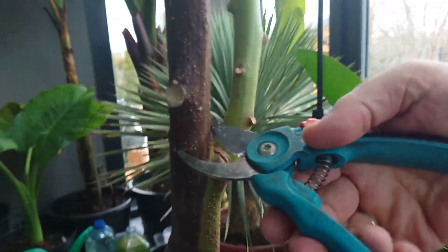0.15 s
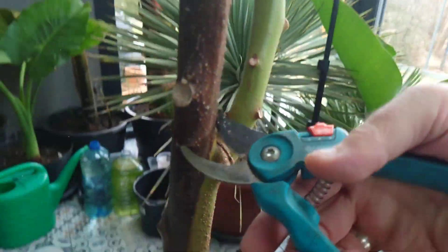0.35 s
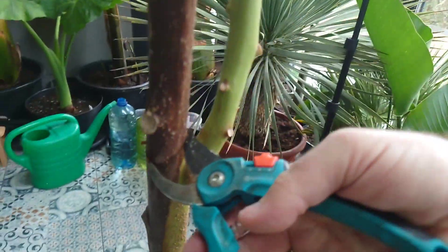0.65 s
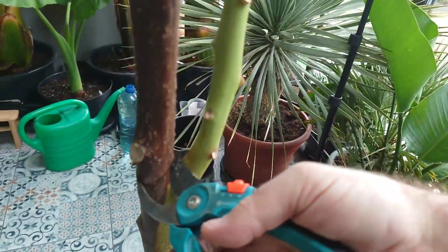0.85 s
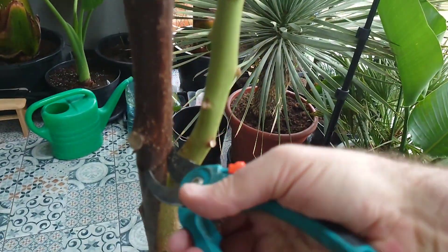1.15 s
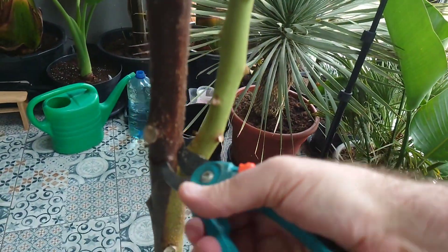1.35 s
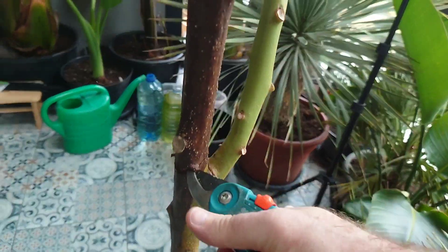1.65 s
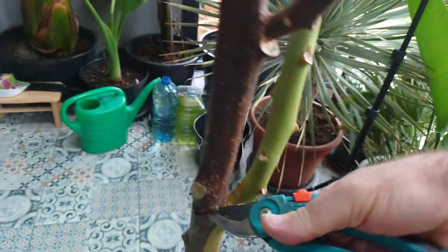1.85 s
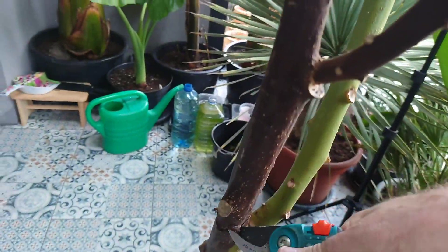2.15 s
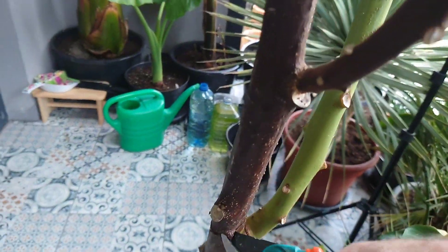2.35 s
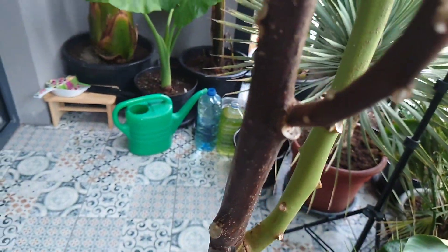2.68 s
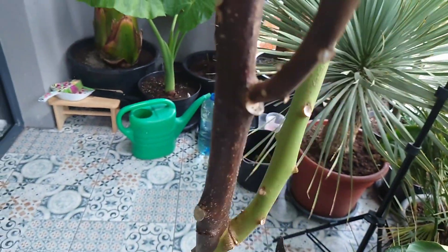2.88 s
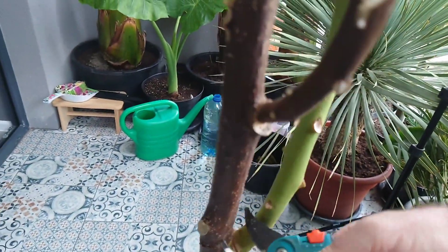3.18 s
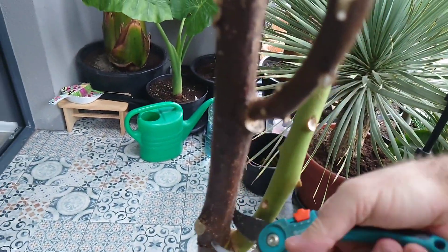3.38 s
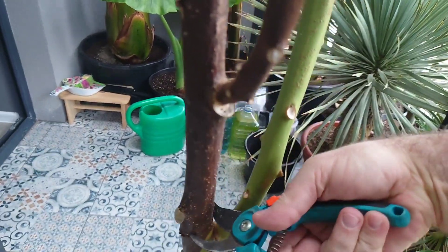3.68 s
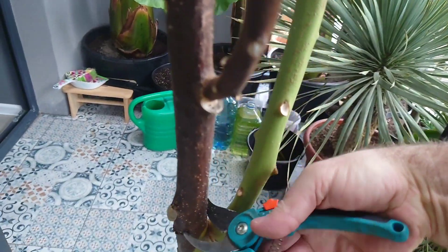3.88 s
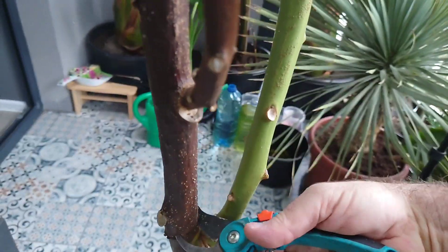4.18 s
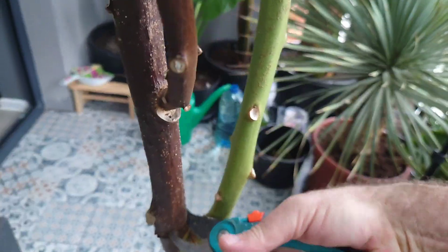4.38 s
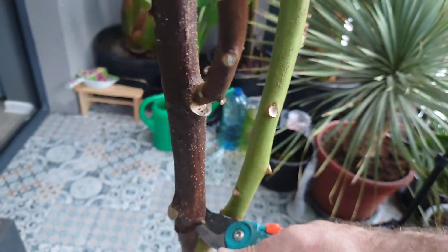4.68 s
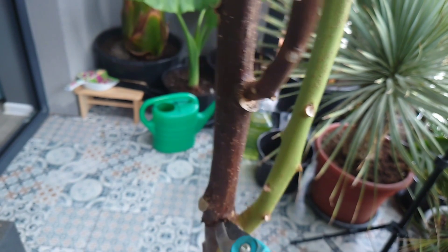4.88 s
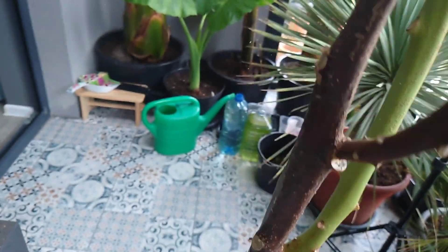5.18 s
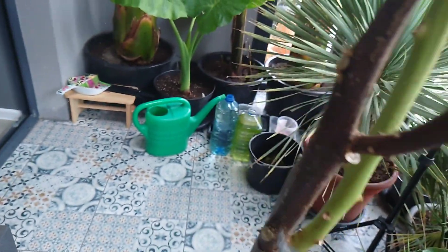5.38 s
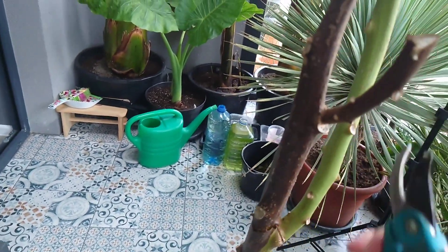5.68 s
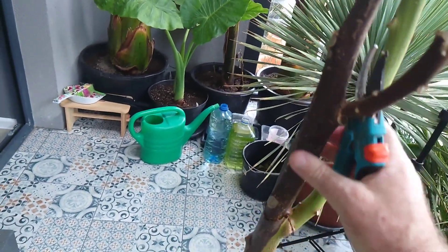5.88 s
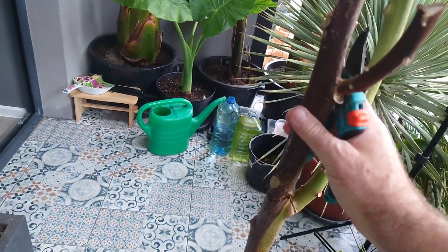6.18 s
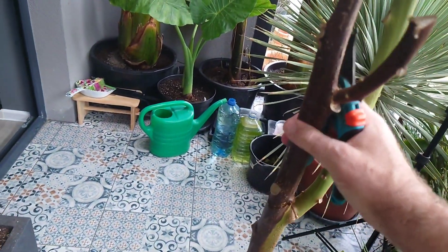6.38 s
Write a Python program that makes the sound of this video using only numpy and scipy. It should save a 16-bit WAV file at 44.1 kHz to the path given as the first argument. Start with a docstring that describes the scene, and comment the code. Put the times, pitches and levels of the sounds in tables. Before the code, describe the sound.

A hand works pruning shears on a hollow plant stem. Cloth swishes and dull clicks lead to a bright snapping cut, followed by scattered cracks, faint creaks and a thin zip of fabric. After a cluster of ticks comes another sharp clack, then rustling, fumbling and a knock. The sound is close and slightly right of centre, with short diffuse reflections from a small hard-floored room.

```python
"""In a small tiled conservatory, secateurs cut twice through a hollow plant stem, heard close up.
Each cut is a short crunch of breaking fibres, then a clack of the handles and a ringing spring of decaying noise.
Cracks and ticks between the cuts are noise bursts, each with one resonance; rubs, creaks and thin zips join them.
A sleeve swishes in three bands of grainy noise, over low rumble, soft air and a diffuse room.
Two microphone ports, each with its own response, colour everything differently."""
import sys
import numpy as np
from scipy import signal
from scipy.fft import rfft, irfft, next_fast_len
from scipy.io import wavfile

SR = 44100
rng = np.random.default_rng(int(sys.argv[2]) if len(sys.argv) > 2 else 0)


def store_wav(level_fs):
    """Save 16-bit WAV to argv[1]."""
    pcm = np.round(np.clip(np.atleast_2d(level_fs), -1, 1) * 32767)
    wavfile.write(sys.argv[1], SR, pcm.T.astype(np.int16))


N = 288674
TIME = np.arange(N) / SR
PADDED = next_fast_len(N, True)  # samples in a whole-length spectrum
BIN_HZ = np.fft.rfftfreq(PADDED, 1 / SR)


def gain_of(db):
    """Decibels to amplitude."""
    return 10 ** (np.asarray(db) / 20)


def evened(x):
    """Scaled to rms 1."""
    return x / np.sqrt(np.mean(x ** 2) + 1e-20)


def read(points, hz):
    """A curve joined by straight lines on a log-frequency axis."""
    f, value = np.transpose(points)
    return np.interp(np.log(hz + 1), np.log(f + 1), value)


def add(mix, s, sound):
    """Mixes a sound in at time s, in seconds."""
    part = mix[max(round(s * SR), 0):][:len(sound)]
    part += sound[:len(part)]


def colour(x, points, size=2048):
    """Causal minimum-phase filter with the given spectrum: nothing sounds before the attack."""
    log_gain = np.log(gain_of(read(points, abs(np.fft.fftfreq(size, 1 / SR)))))
    taps = np.fft.ifft(np.exp(np.conj(signal.hilbert(log_gain)))).real
    return signal.oaconvolve(x, taps[:size // 2])


def noise(points):
    """Steady noise with the given spectrum."""
    white = rfft(rng.standard_normal(PADDED))
    return irfft(white * gain_of(read(points, BIN_HZ)), PADDED)[:N]


def waver(rate_hz):
    """Random drift of rms 1; its spectrum falls by a factor e for every rate_hz."""
    white = rfft(rng.standard_normal(PADDED))
    return evened(irfft(white * np.exp(-BIN_HZ / rate_hz), PADDED)[:N])


def fracture(length, spread_db):
    """A run of tiny breaks of uneven size, with an even spectrum and rms 1."""
    count = max(int(length * SR), 8)
    push, size = rng.standard_normal((2, 4096))[:, :count]
    spectrum = rfft(push * gain_of(spread_db * size))
    flat = spectrum / (abs(spectrum) + 1e-9)
    return evened(irfft(flat, count))


def peak(hz, centre_hz, width_hz):
    """Gain of a single resonance, 1 at its centre."""
    return 1 / np.sqrt(1 + ((hz - centre_hz ** 2 / hz) / width_hz) ** 2)


def ringing(points, centre_hz, db, width_hz, size=160):
    """A spectrum with one resonance standing on it."""
    hz = np.geomspace(20, SR / 2, size)
    gain = np.hypot(gain_of(read(points, hz)), gain_of(db) * peak(hz, centre_hz, width_hz))
    return np.transpose([hz, 20 * np.log10(gain)])


def at_ports(x):
    """The hand works a little to the right, so its sound reaches the left port later."""
    # Lag of the left port behind the right. Each row: frequency in Hz, phase in radians.
    port_phase = [(50, 0), (1200, .25), (2100, -.8), (3100, -2.8), (3800, -5.2), (7300, -8.5), (8500, -14),
                  (16000, -23)]
    left = irfft(rfft(x, PADDED) * np.exp(1j * read(port_phase, BIN_HZ)), PADDED)[:N]
    return np.array([left, x])


def background(rumble_db=-50.5, air_db=-58, rumble_apart=0.49, air_apart=0.62):
    """Low rumble and the soft air of the room, mostly shared by both ports."""
    # Spectrum of the rumble. Each row: frequency in Hz, relative level in dB.
    rumble_shape = [(10, -5), (18, 3), (30, -9.5), (60, -14), (110, -26), (200, -33.5), (400, -59.5),
                    (1500, -74)]
    # Spectrum of the room air. Each row: frequency in Hz, relative level in dB.
    air_shape = [(100, -7), (260, -7), (380, 6), (500, -5), (700, -6.5), (1100, -11.5), (2000, -48),
                 (5000, -38), (15000, -22.5)]
    rumble_sides = np.array([noise(rumble_shape), noise(rumble_shape)])
    air_sides = np.array([noise(air_shape), noise(air_shape)])
    rumble = evened(noise(rumble_shape) + rumble_apart * rumble_sides)
    air = noise(air_shape) + air_apart * air_sides
    return gain_of(rumble_db) * rumble + gain_of(air_db) * air


def room(x, wet_db=-10, early_db=-11, early_decay=0.011):
    """Close leaves and tiles scatter the sound almost at once; the room follows with a diffuse tail."""
    # Reverberation time. Each row: frequency in Hz, time to fall by 60 dB in seconds.
    room_t60 = [(150, 0.62), (400, 0.34), (2000, 0.65), (6000, 0.33), (15000, 0.43)]
    # Tone of the tail. Each row: frequency in Hz, relative level in dB.
    room_colour = [(100, 15), (250, -12.5), (400, 11.5), (800, 2.5), (2000, -3.5), (6000, 5.5),
                   (15000, 1.5)]
    # about 4000 random reflections a second for each port
    taps = rng.choice([-1., 1.], (2, SR)) * (rng.random((2, SR)) < 4000 / SR)
    t = np.arange(SR) / SR
    hz, frame_s, z = signal.stft(taps * (t > .006), SR, nperseg=256)
    fall_db = 60 * frame_s / read(room_t60, hz)[:, None]
    z = z * gain_of(read(room_colour, hz)[:, None] - fall_db)
    tail = signal.istft(z, SR, nperseg=256)[1][:, :SR]
    early = taps[::-1] * np.exp(-t / early_decay) * (t > .001)
    echo = gain_of(wet_db) * evened(tail) + gain_of(early_db) * evened(early)
    return signal.fftconvolve(x[None], echo / np.sqrt(SR), axes=1)[:, :N]


def fidget():
    """Gain of the small movements of the arm and hand."""
    # Faint shifting of cloth and grip between strokes. Each row: time in seconds, level in dB.
    shifts = [(0, -59.5), (1.3, -58), (2, -55), (2.25, -60), (2.95, -57), (3.15, -66), (3.55, -63.5),
              (4.1, -64.5), (4.75, -62.5), (5.45, -57.5), (5.68, -63), (5.9, -56.5), (6.55, -60.5)]
    return gain_of(np.interp(TIME, *np.transpose(shifts)))


def strokes(size=32, rise_s=0.0092, fall_s=0.019, ease_share=0.1):
    """Levels of the body, hiss and fizz of the cloth: each stroke builds, holds with a swell and dies away."""
    # Strokes of the sleeve as the arm moves. Each row: start in seconds, length in seconds, level in dB,
    # swell over the stroke in dB, body in dB and fizz in dB against the hiss.
    swishes = [(0, 0.032, -45, -7, -10, 8), (0.617, 0.25, -48.5, -3, -1.5, -2), (0.84, 0.19, -40, 8, -4, 8),
               (1.204, 0.015, -55.5, 0, 12.5, 8), (1.691, 0.029, -37.5, 0, -2.5, -6),
               (1.773, 0.12, -40, 0.5, -2.5, 6), (2, 0.062, -62.5, -4, 12, -10),
               (2.395, 0.21, -49.5, 5.5, -1.5, -0.5), (2.729, 0.18, -49, -2.5, 3, 0),
               (3.246, 0.091, -56.5, -6, 3, -4), (3.342, 0.12, -53, -1.5, -14, -0.5),
               (3.636, 0.18, -47.5, 2, -18, 0), (4.175, 0.028, -49.5, -0.5, 3, 0),
               (4.476, 0.074, -55.5, 3.5, 10, 8), (4.622, .05, -56, -4, 2.5, 3),
               (4.937, 0.072, -45.5, -11.5, -1.5, -7), (5.066, 0.046, -44.5, 1.5, -1.5, -1),
               (5.213, 0.03, -47, -3, 0, 0), (5.322, 0.0072, -55, -7, 4, 10),
               (5.388, 0.037, -53.5, -3, 3.5, 9), (5.505, 0.073, -54.5, -6, -1, 4.5),
               (5.889, 0.13, -51.5, 8, 3, 4), (6.103, 0.18, -46.5, -6.5, 3, 0.5),
               (6.499, 0.023, -49.5, -1, 5.5, 2)]
    # the fizz needs speed: its steeper edges bring it in last and take it out first
    steepness = [[1], [1], [1.44]]
    t = TIME[::size]
    power = (fidget()[::size] * gain_of([[6], [0], [1.5]])) ** 2
    for s, length, db, swell_db, body_db, fizz_db in swishes:
        age, ease = t - s, ease_share * length
        rise = np.minimum(age, 0) / (rise_s + ease)
        fall = np.maximum(age - length, 0) / (fall_s + ease)
        hold = gain_of(db + swell_db * (np.clip(age / length, 0, 1) - .5))
        bands = gain_of([[body_db], [0], [fizz_db]])
        power += (hold * bands * np.exp((rise - fall) * steepness)) ** 2
    return [np.interp(TIME, t, level) for level in np.sqrt(power)]


def clothing(body, hiss, fizz, grain_db=2.5, grain_hz=170, body_db=-1, hiss_db=-1.5, fizz_trim_db=-1.0):
    """Threads catch and slip: a grainy swish whose three bands follow the stroke levels."""
    low = noise([(100, 2.5), (250, -7.0), (400, -3.0), (700, -3.5), (1000, -3.0),
                 (1600, -4.5), (2300, -6.5), (3200, -5.5), (6000, -33)])
    middle = noise([(500, -36), (1700, -11), (2700, -2.0), (7500, -2.0), (10000, -14.5), (13000, -27)])
    high = noise([(3000, -41.5), (7000, -8.5), (10000, -9), (15000, -5.5)])
    swish = gain_of(body_db) * body * low
    swish += gain_of(hiss_db) * hiss * middle
    swish += gain_of(fizz_trim_db) * fizz * high
    return swish * gain_of(grain_db * waver(grain_hz))


def zips(waver_hz=70):
    """Ribs of the weave run over each other and sing a thin, unsteady glide."""
    # The pitch falls as the arm slows. Each row: start in seconds, length in seconds,
    # first pitch in Hz, last pitch in Hz, level in dB.
    glides = [(2.516, 0.22, 10200, 9100, -61), (2.86, 0.18, 9100, 7600, -69), (4.3, .08, 7450, 7350, -69),
              (4.388, 0.057, 6600, 6000, -71)]
    out, unsteady = np.zeros(N), waver_hz * waver(400)
    for s, length, start_hz, end_hz, db in glides:
        hz = np.linspace(start_hz, end_hz, int(length * SR))
        turns = np.cumsum(hz + unsteady[:len(hz)]) / SR
        add(out, s, gain_of(db) * signal.windows.tukey(len(hz), .8) * np.sin(2 * np.pi * turns))
    return out


def rubs(stick_db=3, stick_hz=60):
    """Skin sticks and slips on bark and plastic with a dull rub."""
    # Slides of the hand. Each row: start in seconds, length in seconds, level in dB.
    slides = [(0.817, 0.11, -77), (2.465, 0.027, -58), (2.703, 0.15, -63.5), (5.87, 0.103, -62),
              (6.06, .27, -63.5), (6.486, .08, -60.5)]
    # Tone of the rub. Each row: frequency in Hz, relative level in dB.
    rub_colour = [(60, -10), (140, 4), (260, -9), (370, 4), (500, 2), (900, -19.5), (2500, -28)]
    pressure = np.zeros(N)
    for s, length, db in slides:
        add(pressure, s, gain_of(db) * signal.windows.tukey(int(length * SR), .5))
    return pressure * evened(noise(rub_colour)) * gain_of(stick_db * waver(stick_hz))


def creaks(per_second=16, over_fidget_db=16, spread_db=4, width_hz=260):
    """The gripped tool keeps giving tiny ticks as the hand shifts, each ringing one of its resonances."""
    out = np.zeros(N)
    for hz in (1130, 1400, 1890, 1990):
        size = gain_of(over_fidget_db + spread_db * np.minimum(rng.exponential(1, N), 2.5))
        pushes = size * (rng.random(N) < per_second / 4 / SR)  # the four resonances share the ticks
        shape = ringing([(100, -11), (3000, -16.0), (15000, -7)], hz, 7.9, width_hz)
        out += colour(pushes, shape)[:N]
    return out * fidget()


def clicks(rise_share=0.27, ring_q=4.24, ring_trim_db=-2, thud_under_ring_db=15):
    """Each click is a burst of breaks plus one ringing resonance; long scrapes start softly."""
    # Cracks of the stem, ticks and knocks of the tool. Each row: start in seconds, level in dB (rms of
    # the uncoloured burst over 10 ms), decay in seconds, ring in Hz, body in dB, fizz in dB.
    click_rows = [(0.252, -62.5, 0.0024, 1490, 22, -7), (0.548, -73, 0.00097, 1280, 31.5, -11),
                  (0.61, -49.5, 0.0032, 1325, 21, -6), (1.027, -35.5, 0.0052, 1990, 12.5, -2),
                  (1.2014, -46.5, 0.0034, 950, 16, -12), (1.304, -59, 0.00074, 332, 15, 23),
                  (1.318, -51.5, 0.0022, 1750, 16.5, 1), (1.519, -41.5, 0.0052, 670, 18.5, -9),
                  (2.103, -44, 0.015, 1090, -1, -0.5), (2.491, -54.5, 0.01, 390, 33.5, 2),
                  (2.721, -40.5, 0.013, 1700, 4, 2), (2.734, -46, 0.0076, 1500, 10, -6),
                  (2.748, -35, 0.0029, 1330, 13, -7), (2.803, -60, 0.0035, 800, 27, -8),
                  (3.619, -50, 0.0043, 1730, -8, -3), (3.914, -58, 0.0022, 1600, 5, -14),
                  (3.979, -59, 0.00085, 1500, 13, -11), (3.993, -55.5, 0.0012, 1300, 4, -4),
                  (3.998, -51, 0.00062, 1290, 4, -12), (4.168, -47.5, .0067, 1950, -3, -7),
                  (4.198, -49.5, 0.0058, 1950, 0, 0), (4.478, -47, .0065, 1390, 8, 8.5),
                  (4.525, -45.5, 0.0051, 1350, 15, 5), (4.589, -53, .003, 1850, 13, -5),
                  (4.663, -58, .0026, 330, 16, 11), (4.759, -56, .003, 1430, -10, -1),
                  (5.057, -48, .005, 2020, 8, -12), (5.319, -44.5, 0.0098, 1500, -2, -11),
                  (5.368, -49, 0.0069, 1650, 7, -10), (5.407, -57.5, 0.0014, 1490, 25, 0),
                  (5.523, -43, 0.0049, 1190, 4, -15), (5.873, -46.5, 0.0042, 2080, -16, -8),
                  (6.012, -43.5, 0.0017, 1480, 13, -11), (6.091, -26.5, 0.0022, 930, 1, -9.5),
                  (6.467, -46.5, 0.0022, 1300, -2, -6), (6.507, -51, 0.0027, 790, 18, -9)]
    out, t = np.zeros(N), np.arange(SR // 20) / SR
    for s, db, decay, ring_hz, body_db, fizz_db in click_rows:
        thud_db = body_db - thud_under_ring_db  # more body both rings and thuds more
        push = gain_of(db) * np.sqrt(SR / 100)  # energy of 10 ms at this level
        burst = fracture(len(t) / SR, spread_db=7.5)
        age = t[:len(burst)] / max(decay, 1e-4)
        burst = burst * np.exp(-age) * (1 - np.exp(-age / rise_share))
        shape = [(120, thud_db - 6), (400, thud_db), (1200, thud_db / 2), (3000, 0), (7500, 0),
                 (10000, min(fizz_db, 0)), (12800, fizz_db)]
        add(out, s, push * colour(burst / np.linalg.norm(burst), shape))
        # the struck part swings up within a cycle or two and dies away
        damping = np.pi * ring_hz / ring_q
        swing = np.exp(-damping * t) - np.exp(-2 * damping * t)
        ring = 2 * swing / swing.sum() * np.sin(2 * np.pi * ring_hz * t)
        add(out, s, push * gain_of(body_db + ring_trim_db) * ring)
    return out


def cuts(stem_width_hz=350, spring_width_hz=780, spring_t60=0.89, chatter_db=2.0, chatter_hz=90):
    """Fibres tear, the hollow stem gives way with a clack, and the coils of the spring chatter on."""
    # Blades going through the stem. Each row: start in seconds, crunch length in seconds, crunch level in dB,
    # clack length in seconds, clack level in dB, stem resonance in Hz, its level in dB,
    # spring pitch in Hz, its starting level in dB.
    cut_rows = [(1.5948, .0038, -24.5, .0034, -14, 2090, 7, 1990, -47),
                (4.8218, .0064, -26, 0.00097, -10.5, 1290, -1, 1900, -53)]
    # Tone of the tearing fibres. Each row: frequency in Hz, level in dB.
    crunch_colour = [(100, -29.5), (600, -3.5), (1900, 3), (3000, 8), (8000, -11.5), (15000, 0.5)]
    # Tone of the clack under the stem resonance. Each row: frequency in Hz, level in dB.
    clack_colour = [(100, -2), (200, -1), (350, -0.5), (500, -6.5), (750, -3.5), (1200, -11.5), (2000, -3),
                    (2800, -4), (4800, 0), (8000, -0.5), (15000, -15)]
    out, t, hz = np.zeros(N), np.arange(SR) / SR, np.fft.rfftfreq(SR, 1 / SR) + 1
    chatter = chatter_db * waver(chatter_hz)
    for s, tear, crunch_db, shut, clack_db, stem_hz, stem_db, spring_hz, spring_db in cut_rows:
        add(out, s, gain_of(crunch_db) * colour(fracture(tear, spread_db=5.5), crunch_colour))
        body = ringing(clack_colour, stem_hz, stem_db, stem_width_hz)
        add(out, s + tear, gain_of(clack_db) * colour(fracture(shut, spread_db=1.5), body))
        # the spring is a narrow band of noise, dying away unsteadily
        band = np.exp(-(2 * (hz - spring_hz) / spring_width_hz) ** 2)
        coils = evened(irfft(rfft(rng.standard_normal(SR)) * band, SR))
        level_db = spring_db - 60 * t / spring_t60 + np.interp(s + t, TIME, chatter)
        add(out, s + tear, coils * gain_of(level_db))
    return out


def scene(cloth_spread=0.84, cut_left_db=1.5, hand_room_db=-0.5):
    """The tool is a point source; the cloth is broad, so each port hears it a little differently."""
    snips, levels = cuts(), strokes()
    hand = clicks() + creaks() + rubs() + zips()
    cloth = clothing(*levels)
    # a second swish, of opposite sign at the two ports, widens the first
    side = at_ports(clothing(*levels)) * [[1], [-1]]
    wide = (at_ports(cloth) + cloth_spread * side) / np.hypot(1, cloth_spread)
    near = at_ports(snips) * gain_of([[cut_left_db], [0]]) + at_ports(hand)
    echoes = room(snips + gain_of(hand_room_db) * hand + cloth)
    return near + wide + echoes + background()


def record(dry, edge_hz=15900):
    """Each port has its own colour; then a steep low-pass limits the band."""
    # Response of the left microphone port. Each row: frequency in Hz, gain in dB.
    left_port = [(100, 1.5), (800, -1.5), (1400, 2), (1750, 7), (2250, 4.5), (2650, -3.5), (3400, -9),
                 (4200, -6.5), (5400, -14), (7500, -16.5), (8800, -7.5), (9700, -14.5), (10500, -5),
                 (15500, -3)]
    # Response of the right microphone port. Each row: frequency in Hz, gain in dB.
    right_port = [(100, 2.5), (1100, 0), (2000, 5), (3000, 4), (5000, 5.5), (7000, 5), (7900, -9.5),
                  (9500, -1.5), (10200, -6.5), (11500, -2.5), (15500, 1)]
    heard = np.array([colour(x, port)[:N] for x, port in zip(dry, (left_port, right_port))])
    low_pass = signal.firwin(511, edge_hz, window=("kaiser", 9), fs=SR)
    return signal.oaconvolve(heard, low_pass[None], "same")


dry = scene()
out = record(dry)
store_wav(out)
```